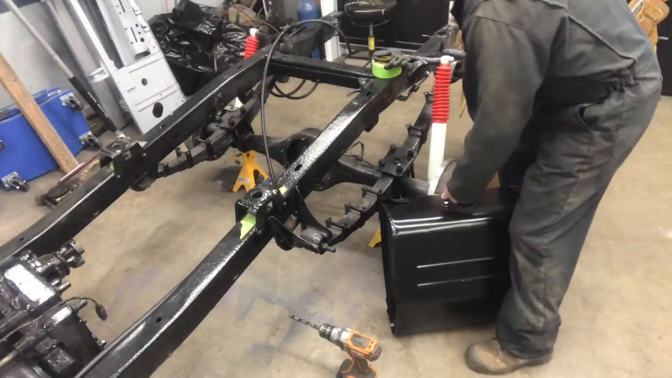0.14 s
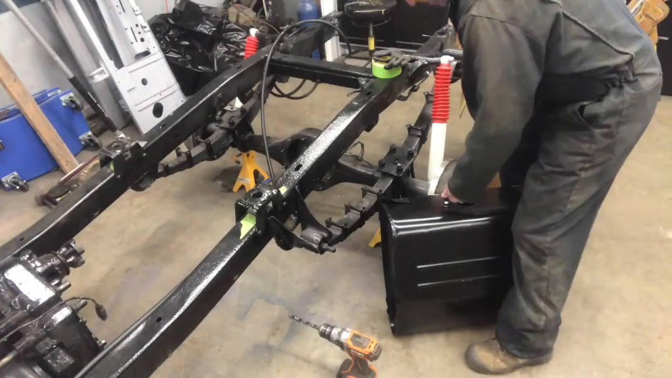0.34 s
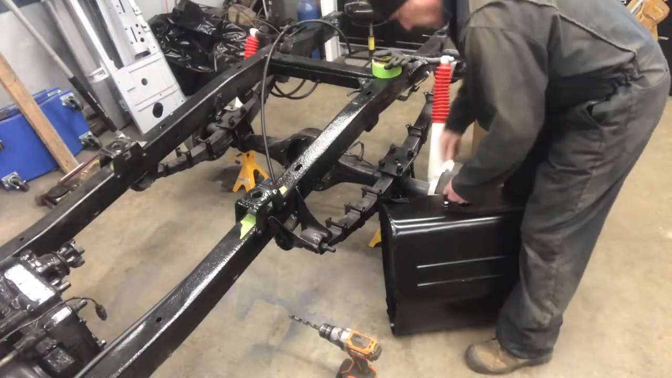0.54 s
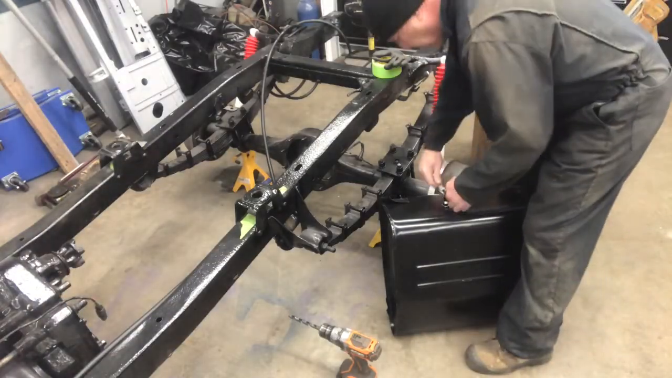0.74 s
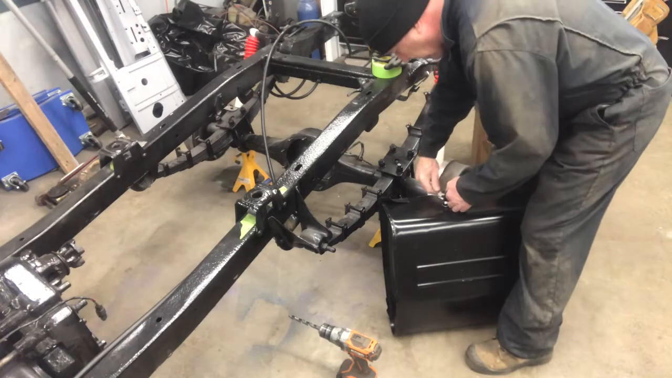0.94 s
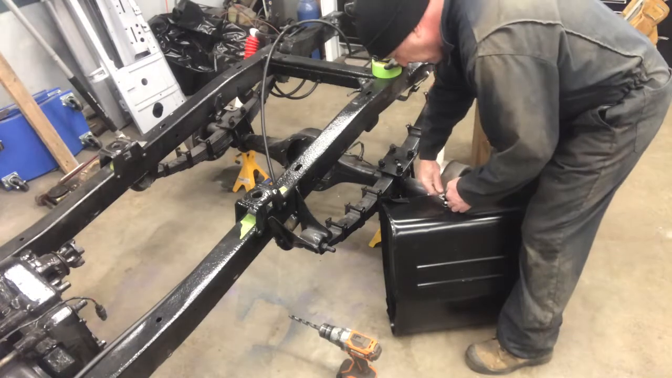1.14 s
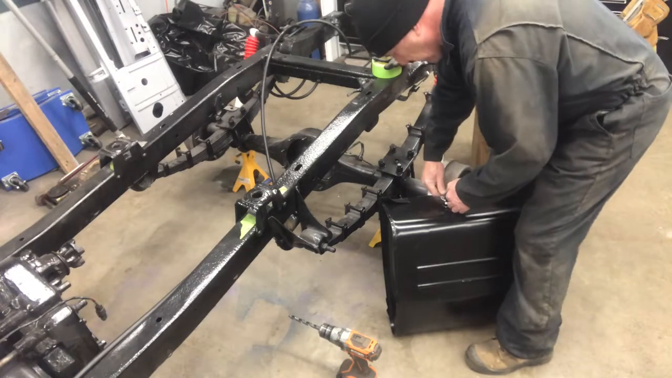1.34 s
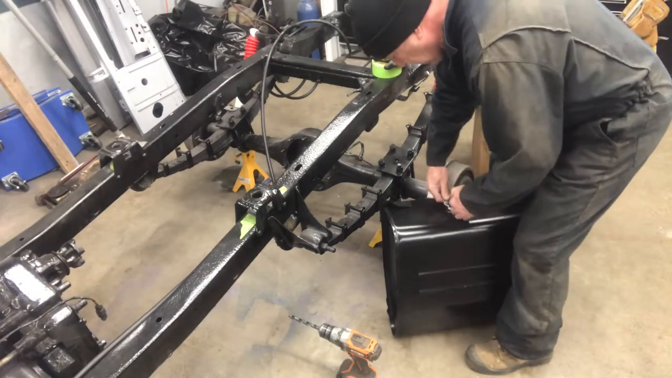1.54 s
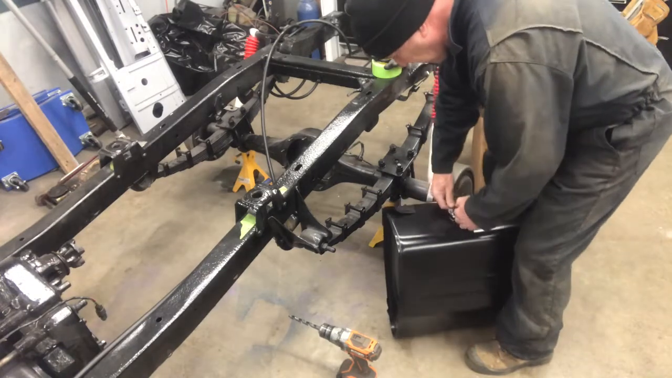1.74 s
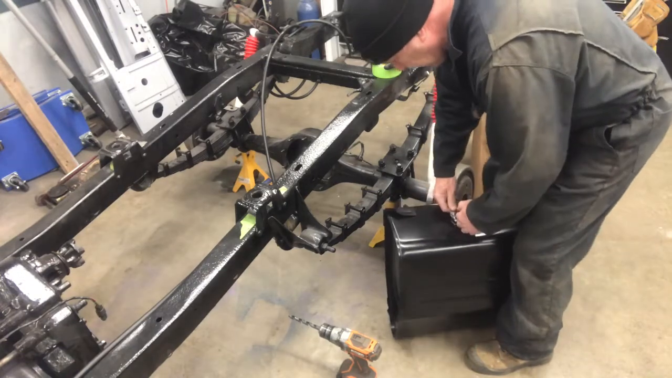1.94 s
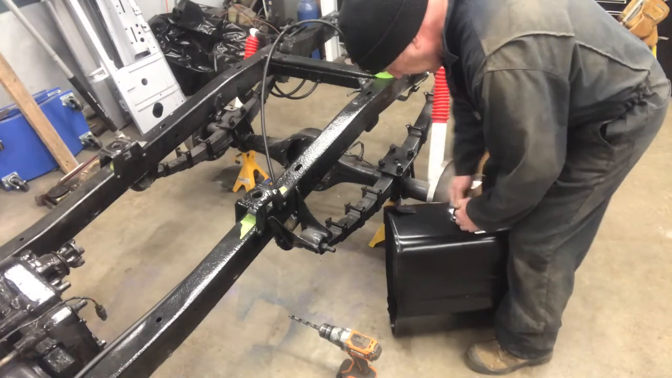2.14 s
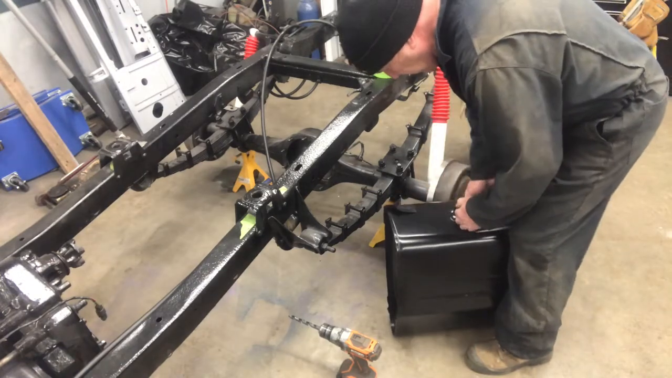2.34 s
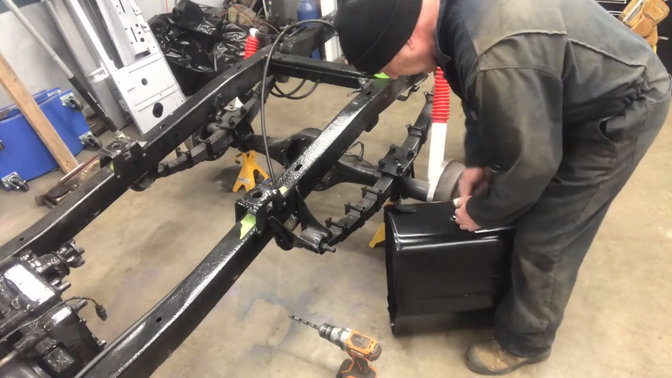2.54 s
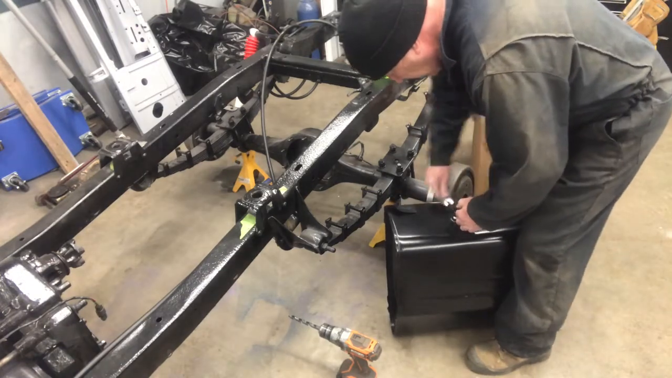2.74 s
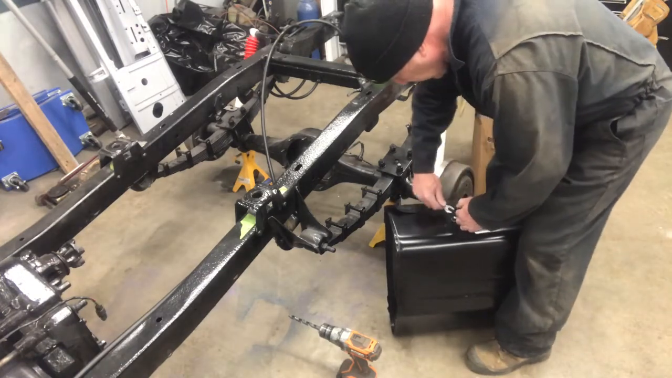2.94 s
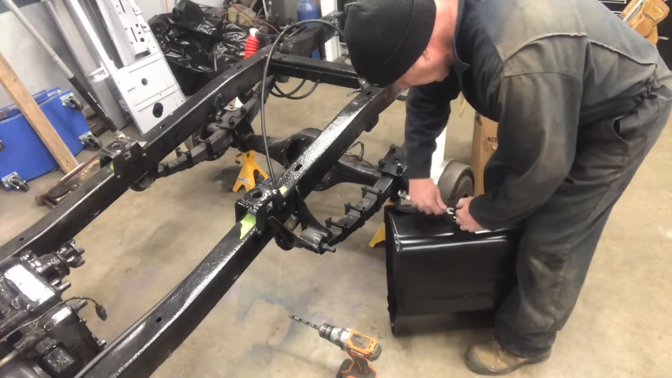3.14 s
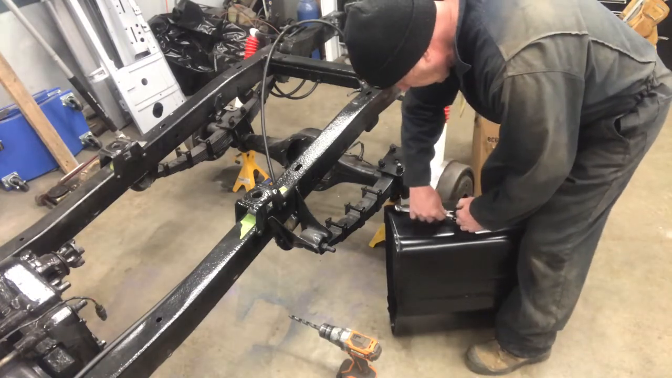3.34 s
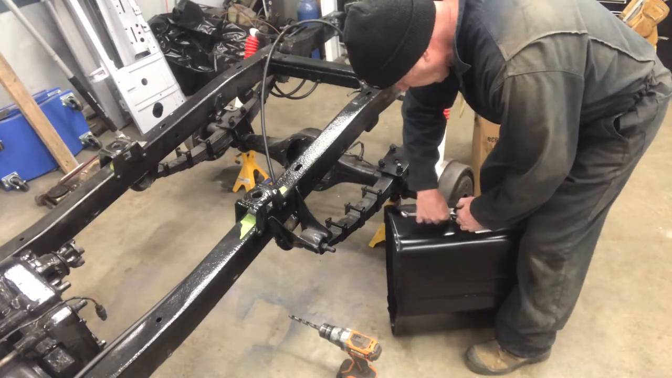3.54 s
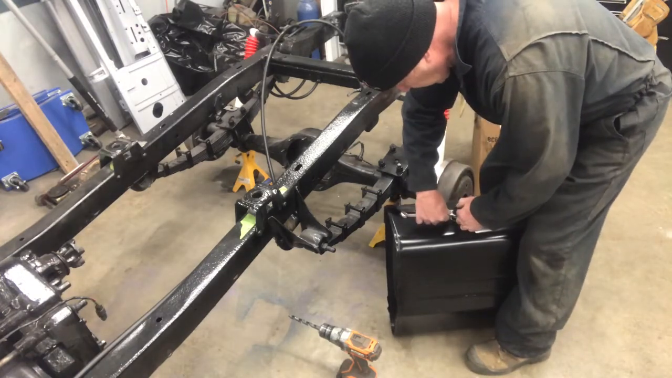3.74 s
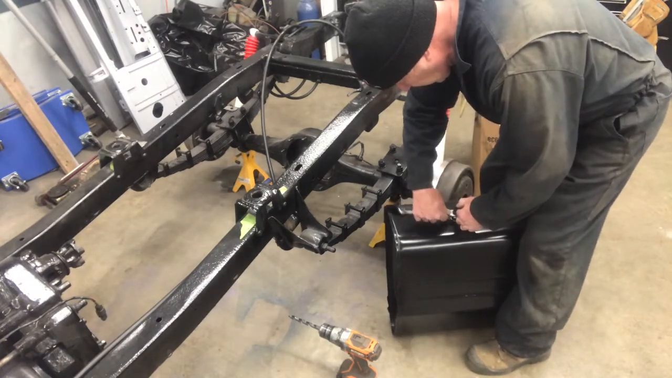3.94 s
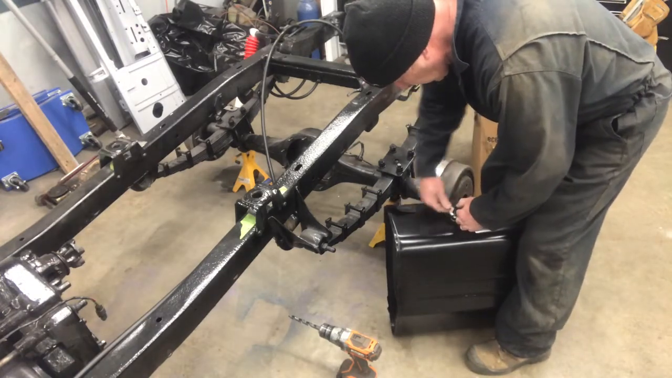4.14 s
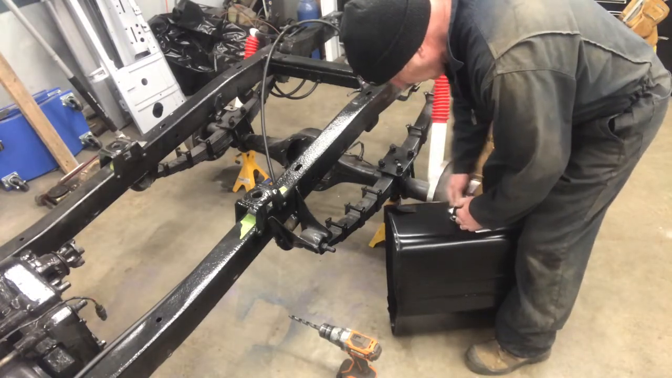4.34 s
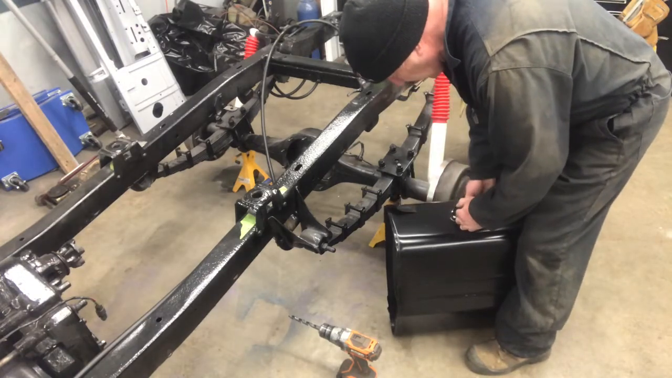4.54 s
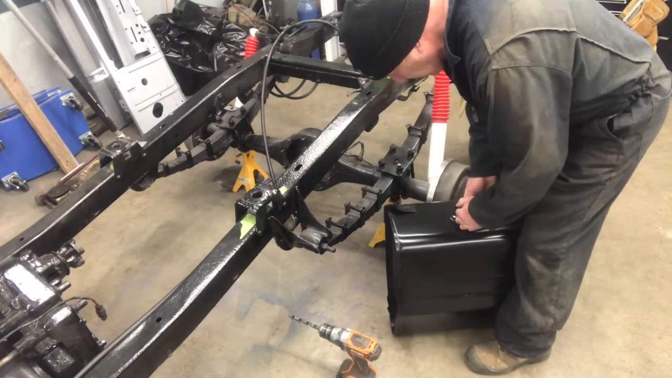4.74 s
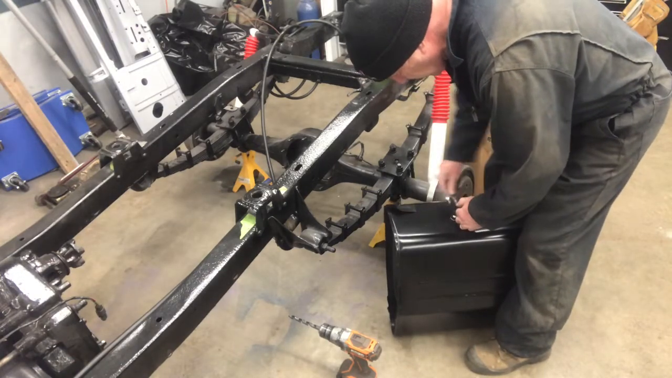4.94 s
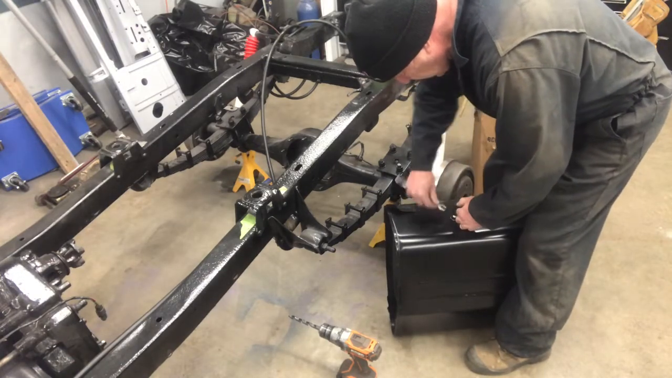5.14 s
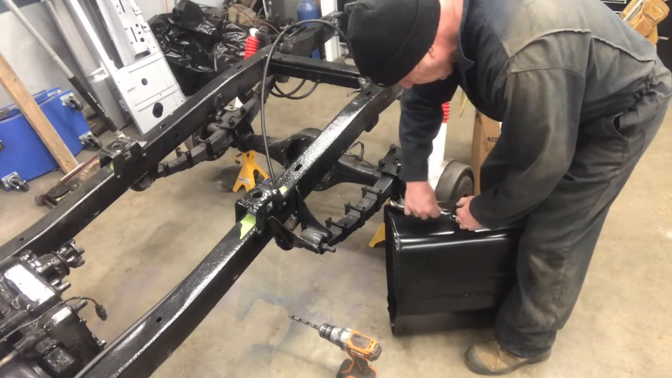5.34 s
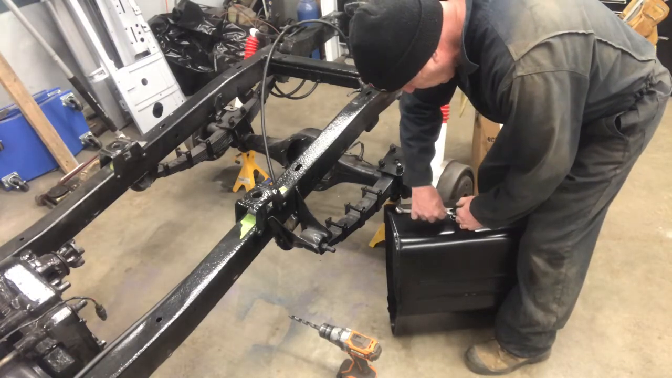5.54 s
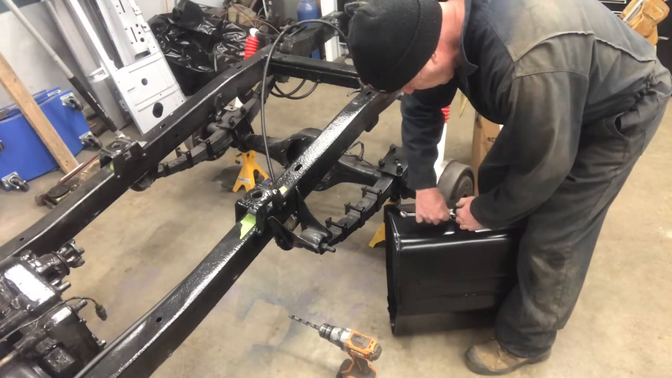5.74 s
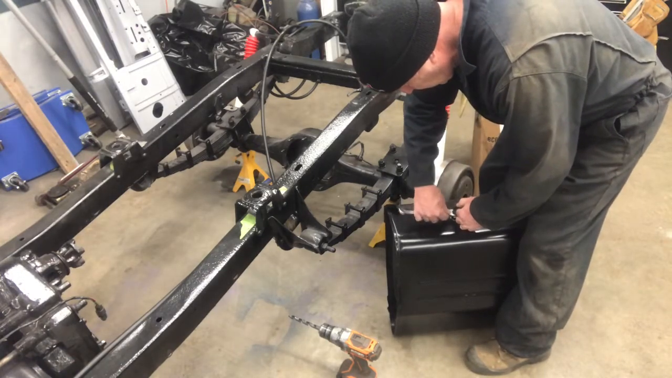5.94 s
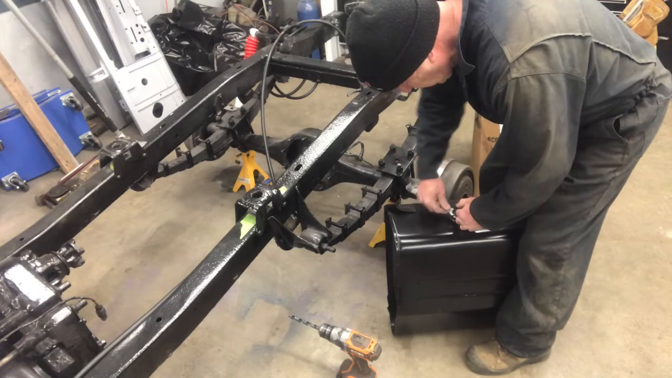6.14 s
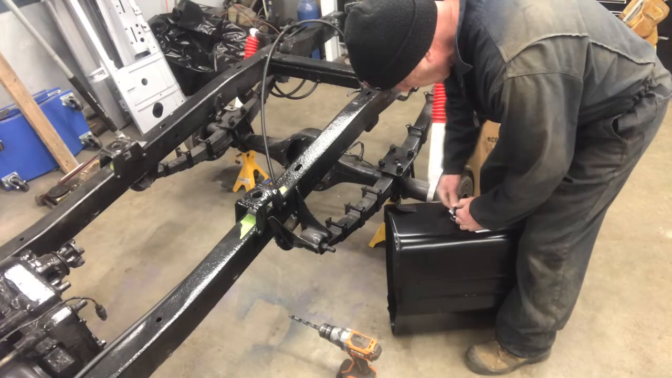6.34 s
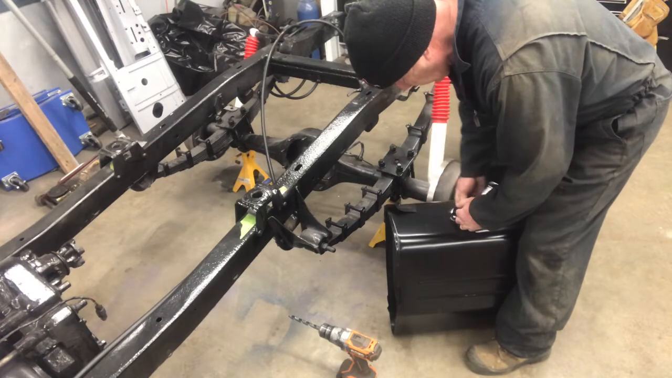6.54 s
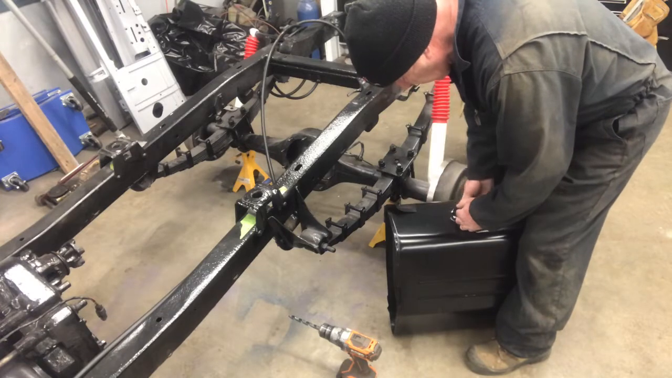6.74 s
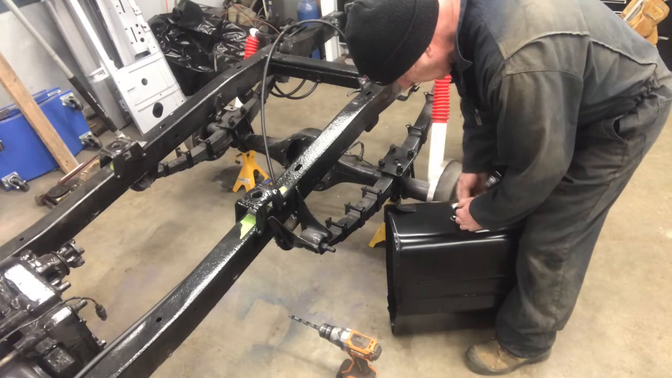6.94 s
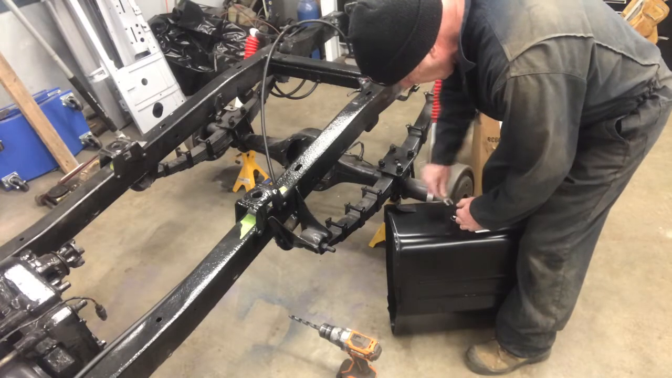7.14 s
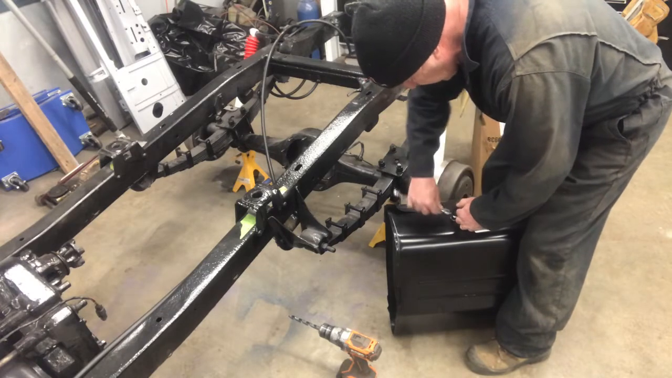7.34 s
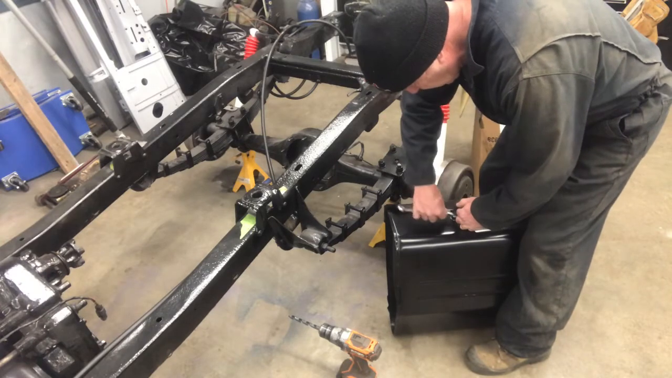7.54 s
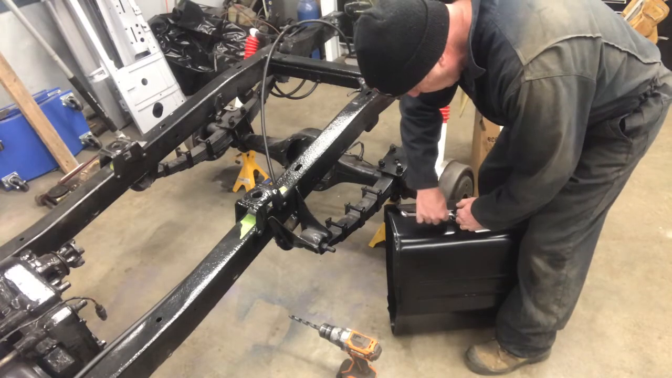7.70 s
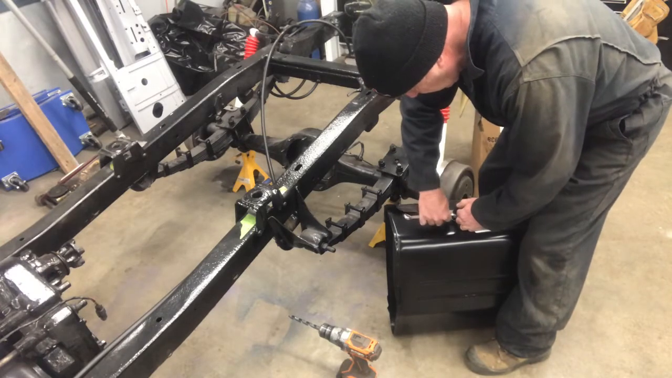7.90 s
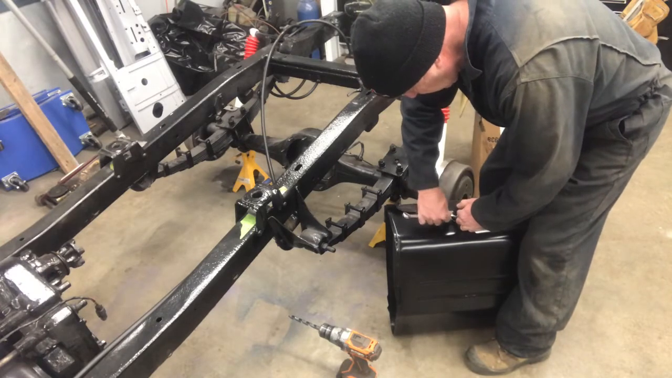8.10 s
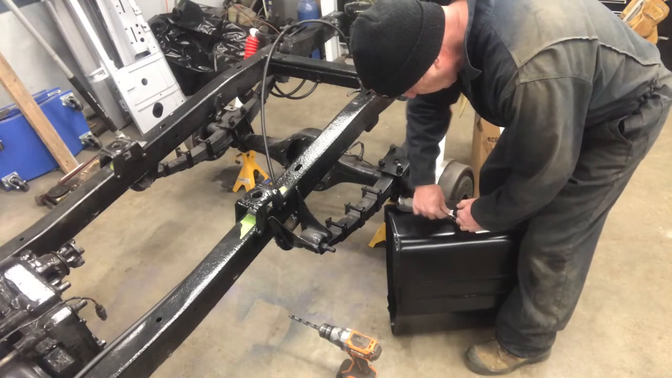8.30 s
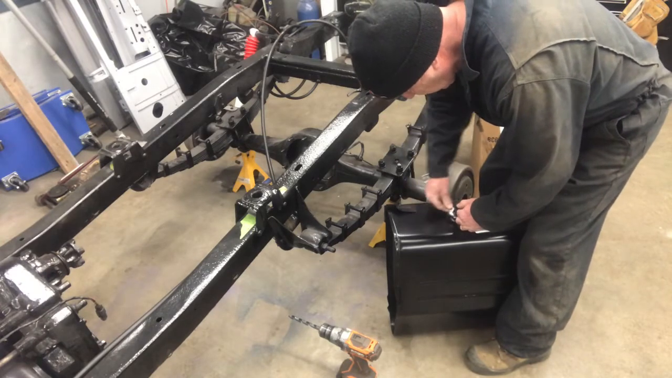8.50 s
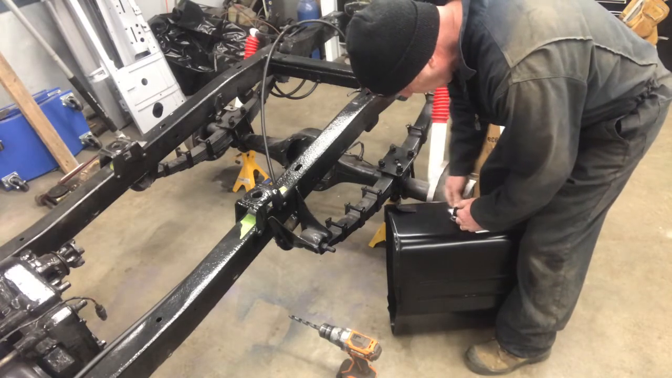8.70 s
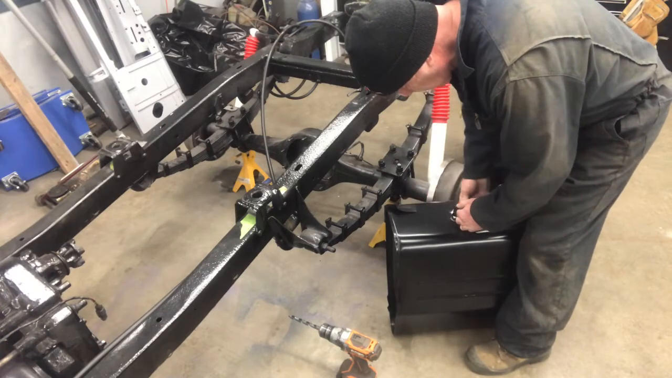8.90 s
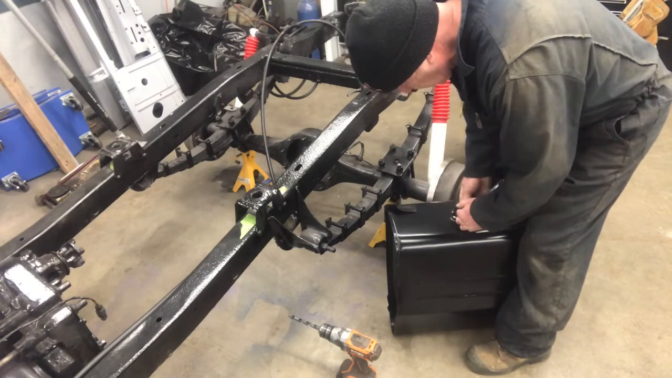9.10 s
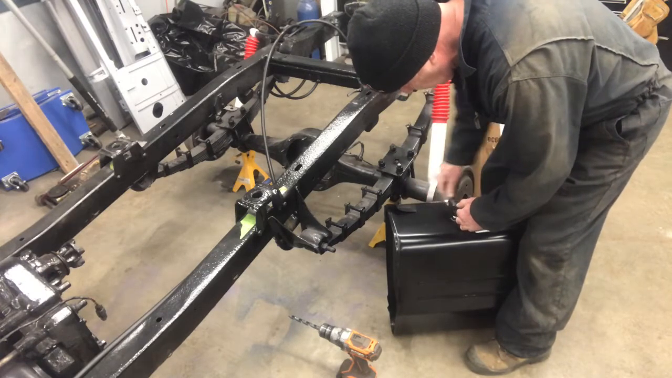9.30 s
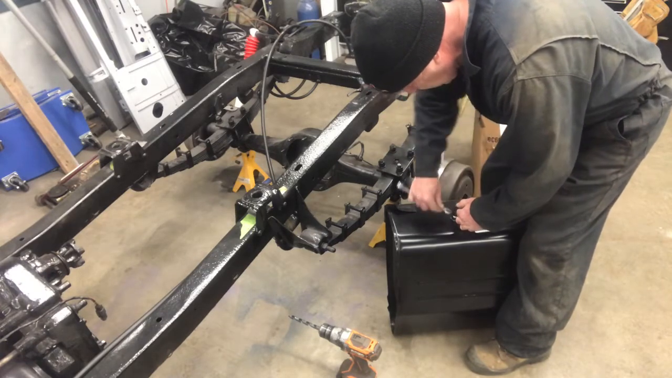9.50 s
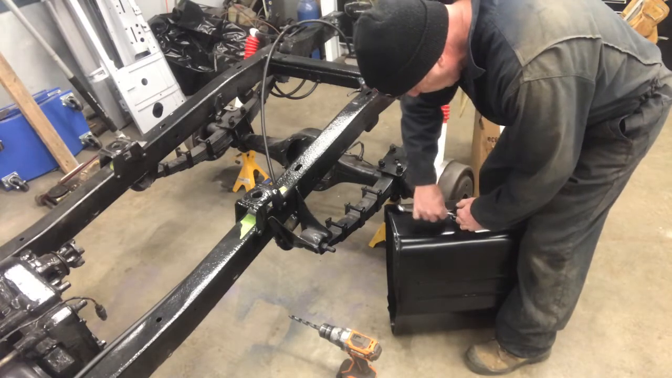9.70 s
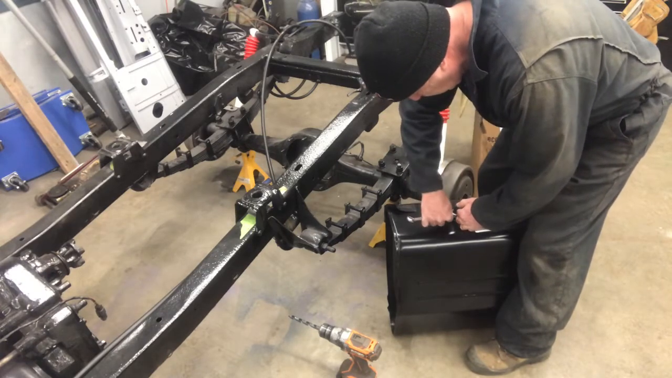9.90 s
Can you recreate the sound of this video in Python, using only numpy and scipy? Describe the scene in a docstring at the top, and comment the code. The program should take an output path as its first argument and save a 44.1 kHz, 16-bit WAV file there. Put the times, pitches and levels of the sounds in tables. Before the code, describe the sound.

Loose metal bangs on a hollow metal tank, hands bump and rub it, then spaced wrench clacks, scrapes and hollow clunks over faint hum.

```python
"""A workshop with an empty steel fuel tank on the floor, where a fitting is tightened with a wrench.
Loose metal clangs on the tank, small parts tick, a hand thuds and rubs on the shell, then the wrench works
in strokes: it clacks onto the fitting, clunks round against the tank and scrapes. Each blow is a noise crack
plus decaying sines and beating noise bands for the tank; scrapes are swarms of tiny blows, the rub is grains.
Dull air, hum and hiss are steady beneath, with faint electrical ticking and sizzle."""
import sys
import numpy as np
from scipy import signal
from scipy.fft import rfft, irfft
from scipy.io import wavfile
from scipy.ndimage import uniform_filter1d

SR = 44100
rng = np.random.default_rng(int(sys.argv[2]) if len(sys.argv) > 2 else 0)


def output_pcm(signal):
    """Save a mono or channel-first signal as 16-bit PCM at the path in sys.argv[1].

    Samples are clipped to [-1, 1] before scaling.
    """
    pcm = np.clip(np.atleast_2d(signal).T, -1, 1) * 32767
    wavfile.write(sys.argv[1], SR, np.round(pcm).astype(np.int16))


N = 439236


def amp(db):
    """Decibels to gain."""
    return 10 ** (np.asarray(db) / 20)


def evened(x):
    """Scales to rms 1."""
    return x / np.sqrt(np.mean(x ** 2) + 1e-20)


def read(points, hz, axis=1):
    """One column of a table, joined by straight lines over log frequency."""
    table = np.array(points)
    return np.interp(np.log(hz + 1), np.log(table[:, 0] + 1), table[:, axis])


def add(mix, start_s, sound):
    """Mixes a sound in at its start time."""
    part = mix[max(round(start_s * SR), 0):][:len(sound)]
    part += sound[:len(part)]


def colour(x, db_at):
    """Filters x by a gain in dB that is a function of frequency."""
    hz = np.fft.rfftfreq(len(x), 1 / SR)
    return irfft(rfft(x) * amp(db_at(hz)), len(x))


def drift(x, knots_per_unit):
    """A random wander of about unit size along time or frequency."""
    knots = rng.standard_normal(4096)
    return np.interp(x * knots_per_unit, np.arange(len(knots)), knots)


# Spectrum of the still workshop air. Each row: frequency in Hz, relative density in dB per Hz.
AIR_COLOUR = [(20, -27.5), (35, -5), (48, 5.5), (65, 4), (90, -5.5), (130, -8), (170, -3.5), (340, -7),
              (550, -13.5), (800, -16), (1250, -15), (2200, -26.5), (4400, -27.5), (5200, -42)]
# Hum of the machines. Each row: frequency in Hz, rms level in dB ahead of the microphone.
HUM = [(59.2, -54), (120, -67), (129.2, -62.5), (176, -78), (217, -66), (346, -67)]


def workshop(air_db=-56, hiss_db=-67.0, waver=.07):
    """Room tone: dull filtered noise, sines that waver gently in level and phase, and the microphone's hiss."""
    t = np.arange(N) / SR
    air = evened(colour(rng.standard_normal(N), lambda f: read(AIR_COLOUR, f)))
    hum = np.zeros(N)
    for hz, db in HUM:
        level = amp(db) * np.sqrt(2) * (1 + waver * drift(t, 3.6))
        hum += level * np.sin(2 * np.pi * hz * t + 0.33 * drift(t, 1.53))
    return amp(air_db) * air + hum + amp(hiss_db) * rng.standard_normal(N)


# Thin electrical sizzle in short bursts.
# Each row: centre in Hz, width in Hz, rms level in dB ahead of the microphone.
SIZZLE = [(9650, 420, -73.5), (11500, 550, -80.5), (13100, 800, -72)]


def interference(tick_db=-39.5, stray_db=-41.5, strays_per_s=25, burst_hz=32.3):
    """Electrical pickup: regular pin-prick ticks, weaker stray ones, and fluttering bands of noise."""
    t = np.arange(N) / SR
    ticks = amp(stray_db) * (rng.random(N) < strays_per_s / SR) * rng.uniform(.5, 1.2, N)
    regular = np.arange(.0145, N / SR, .1024)  # first tick and spacing in seconds
    ticks[(regular * SR).astype(int)] += amp(tick_db + rng.standard_normal(len(regular)))
    tick_colour = [(500, -37), (3500, 7.5), (5200, -2.5), (7500, 3), (11000, 5), (15000, 10)]  # Hz, dB
    out = colour(ticks, lambda f: read(tick_colour, f))
    for hz, width_hz, db in SIZZLE:
        band = colour(rng.standard_normal(N), lambda f: -np.minimum(3 * (2 * (f - hz) / width_hz) ** 2, 80))
        cycle = np.sin(2 * np.pi * (burst_hz * t + rng.random()) + drift(t, 6))
        bursts = np.clip(cycle + .6 * drift(t, 120) - .3, 0, .6)
        out += amp(db) * evened(band * bursts)
    return out


def contact_db(hz, contact, octaves=0.32):
    """A heavy push feeds the low modes, a hard edge the high ones, and the spot hit lifts or cuts one band."""
    bass_db, hard_db, favoured_hz, boost_db = contact
    heavy = read([(170, 0.94), (330, 0.35), (700, 0.0029)], hz)
    hard = read([(1300, 0.039), (3800, 1.105), (9000, 1.91)], hz)
    favoured = np.exp(-.5 * (np.log2((hz + 1) / favoured_hz) / octaves) ** 2)
    return bass_db * heavy + hard_db * hard + boost_db * favoured


def plain(bass_db, hard_db):
    """A contact that favours no band: its boost is zero, so its frequency does not matter."""
    return bass_db, hard_db, 424, 0


def dying(t, t60, hold=0.0069):
    """Exponential decay, held up at first while the room fills with reflections."""
    return amp(-60 * (np.hypot(t, hold) - hold) / t60)


# Where a blow lands: the free shell, the shell held down by a hand, or the fitting.
PLACES = ["free", "held", "fitting"]
# The crowd of weaker, overlapping modes.
# Each row: frequency in Hz, then relative level in dB struck free, held and on the fitting.
CLATTER = [(54, -15, -17, -32), (100, -2, -30, -39), (134, -2, -10.5, -26), (248, -1, -15.5, -22),
           (340, -1.5, -16.5, -22.5), (586, -5.5, -18.5, -24.5), (970, -15, -20, -31.5),
           (1290, -7.5, -13, -26.5), (1550, -14, -18, -35.5), (1910, -14.5, -22.5, -29.5),
           (4350, -21, -24.5, -38.5), (5060, -31.5, -34, -44.5), (7680, -37.5, -38.5, -51.5),
           (15260, -39, -41, -65)]
# How long that crowd rings in the workshop, before the blow's ring factor.
# Each row: frequency in Hz, base 60 dB decay time in seconds.
BASE_T60 = [(100, 0.7), (300, 0.69), (800, 0.9), (2000, 0.7), (4500, 0.64), (5500, 0.59), (9000, 0.41),
            (15000, 0.19)]


def clatter(t, place, contact, ring, swell_cycles=0.9, patchy_db=2.0):
    """The overlapping modes and their echoes: each noise band beats in patches and dies at its own speed."""
    hz, times, z = signal.stft(rng.standard_normal(len(t)), SR, nperseg=512)
    patches = uniform_filter1d(rng.standard_normal(z.shape), size=2, axis=0)
    patches = uniform_filter1d(patches, size=6, axis=1)
    z = z * amp(patchy_db * evened(patches))
    z *= dying(times, ring * read(BASE_T60, hz)[:, None])
    z *= 1 - np.exp(-(times + 0.0012) * (hz[:, None] + 60) / swell_cycles)
    dense = signal.istft(z, SR, nperseg=512)[1][:len(t)]
    column = 1 + PLACES.index(place)
    dense = colour(dense, lambda f: read(CLATTER, f, axis=column) + contact_db(f, contact))
    return dense * np.minimum(t / 0.00024, 1)  # short fade-in, in seconds


# The clear modes of the tank.
# Each row: frequency in Hz, then relative level in dB struck free, held and on the fitting.
TANK = [(133.45, -25, -40, -49), (150.2, -66, -37, -53), (178.5, -30.5, -26, -41.5),
        (213.8, -21.5, -35.5, -47.5), (252.6, -36, -56, -60.5), (334.6, -19.5, -62, -49.5),
        (375, -23.5, -38, -55), (395.4, -31, -35, -43), (465, -24, -45.5, -46.5),
        (541.5, -31.5, -36, -44.5), (617.5, -51, -51, -46), (757.4, -51, -39, -51),
        (785.5, -28.5, -44, -47), (998, -31, -53, -59), (1042, -40, -36.5, -49), (1081.5, -27, -56, -48),
        (1130, -34, -36.5, -48), (1255, -42, -57, -72), (1345, -33, -49, -51), (1385, -51, -31, -49),
        (1473, -31.5, -46, -73), (1732, -32.5, -38, -49.5), (2058, -36.5, -42, -54.5),
        (2235, -35, -52, -49), (2460, -37.5, -66, -86), (3200, -36, -50, -51.5), (3500, -34, -71, -55.5),
        (3790, -38, -39.5, -53.5), (4460, -40.5, -52, -93), (4430, -56, -41.5, -57.5)]


def modes(t, place, contact, ring, swell_cycles=2.5, waver=0.63):
    """The clear modes as sines: all swell over a few cycles; echoes blur high ones most in size and phase."""
    out = np.zeros(len(t))
    for hz, *levels_db in TANK:
        size = amp(levels_db[PLACES.index(place)] + contact_db(hz, contact))
        swell = 1 - np.exp(-t * hz / swell_cycles)
        blur = np.sqrt(hz / 1000)
        t60 = ring * read(BASE_T60, hz) * read([(200, 1.15), (1400, 1.05), (4000, .85)], hz)
        phase = 2 * np.pi * (hz * t + rng.random()) + .9 * blur * drift(t, 35)
        wobble = 1 + waver * min(blur, 1) * drift(t, 50.7)
        out += size * swell * dying(t, t60) * wobble * np.sin(phase)
    return out


def tank(place, contact, ring, clear_db=0, clear_sustain=0.97):
    """One second of the tank's answer to a blow: clear modes over clatter, their decay scaled by ring."""
    t = np.arange(SR) / SR
    fade = np.minimum((1 - t) * 10, 1) ** 2
    clear = amp(clear_db) * modes(t, place, contact, ring * clear_sustain)
    return fade * (clear + clatter(t, place, contact, ring))


# Metal slides on the fitting.
# Each row: start in seconds, length in seconds, force in dB, boost of the shell's hollow answer in dB.
SCRAPES = [(.0, 0.026, -19, 2), (.265, .05, -22.5, -2), (0.641, 0.034, -14.5, -3), (2.373, .06, -10.5, -4),
           (3.454, 0.062, -8.5, 11), (4.666, 0.053, -8, 6.5), (6.829, 0.058, -7.5, 8)]


def scrapes(slips_per_s=900, spread_db=7.5, ring=0.85, bass_db=3.5, hard_db=6, hollow_hz=424):
    """Sliding metal sticks and slips: a swelling swarm of tiny blows on the fitting."""
    out = np.zeros(N)
    for start_s, length_s, force_db, hollow_db in SCRAPES:
        n = int(length_s * SR)
        slips = (rng.random(n) < slips_per_s / SR) * rng.choice([-1, 1], n)
        slips = slips * amp(spread_db * rng.standard_normal(n)) * np.linspace(0, 1, n)
        slips /= np.linalg.norm(slips) + 1e-9
        contact = bass_db, hard_db, hollow_hz, hollow_db
        answer = tank("fitting", contact, ring, clear_db=-3.5)  # sliding damps the clear modes
        add(out, start_s, amp(force_db) * signal.fftconvolve(slips, answer))
    return out


def crack(contact, t60=0.15, level_db=-32.5, patchy_db=3.5):
    """The snap of steel on steel, straight from the contact: decaying noise with its own uneven spectrum."""
    t = np.arange(4096) / SR
    shape = [(150, -3), (400, -9.0), (1300, 10.5), (2500, -9.0),
             (4600, 6), (6000, -5.0), (10000, -9.0), (15500, -21)]  # Hz, dB

    def snap_db(f):
        return read(shape, f) + contact_db(f, contact) + patchy_db * drift(f, 0.00307)

    snap = colour(rng.standard_normal(len(t)), snap_db)
    return snap * amp(level_db - 60 * t / t60)


def blow(place, contact, ring, crack_db):
    """One blow cracks and sets the tank ringing."""
    sound = tank(place, contact, ring)
    add(sound, 0, amp(crack_db) * crack(contact))
    return sound


LOOSE_RING = 1.29  # ring factor of the loose fitting

# Small parts touch the loose fitting. Each row: start in seconds, force in dB.
TICKS = [(.345, -11.5), (1.507, -26), (1.944, -16), (2.015, -19), (2.222, -20)]


def part_ticks(bass_db=-21, hard_db=-0.5, thinning_db_per_db=0.6469, crack_db=-7):
    """Light contacts on the loose fitting: the lighter the touch, the thinner its sound."""
    out = np.zeros(N)
    for start_s, force_db in TICKS:
        contact = plain(bass_db, hard_db - thinning_db_per_db * force_db)
        add(out, start_s, amp(force_db) * blow("fitting", contact, LOOSE_RING, crack_db))
    return out


# A hand bumps the shell. Each row: start in seconds, force in dB.
THUDS = [(0.656, -52), (1.966, -28.5), (1.986, -28.5), (2.221, -49)]


def thuds(ring=0.73, crack_db=-19):
    """Soft bumps on the shell: heavy bass, little edge, a short ring."""
    contact = 21.5, -6, 201, 6.5  # bass dB, hardness dB, favoured Hz, boost dB
    out = np.zeros(N)
    for start_s, force_db in THUDS:
        add(out, start_s, amp(force_db) * blow("free", contact, ring, crack_db))
    return out


# Loose metal drops on the free shell. Each row: start in seconds, force in dB.
CLANGS = [(.766, -3), (.938, -10.5), (1.174, -1.93)]


def clangs(ring=1.19, crack_db=11):
    """Hard drops that leave the free shell to ring long, with a strong crack."""
    contact = -3.5, .5, 500, -5  # bass dB, hardness dB, favoured Hz (here cut), boost dB
    out = np.zeros(N)
    for start_s, force_db in CLANGS:
        add(out, start_s, amp(force_db) * blow("free", contact, ring, crack_db))
    return out


# A hand rubs over the steel. Each row: start in seconds, swell length in seconds, level in dB.
RUBS = [(1.652, 0.12, -41.5), (1.833, 0.084, -41.5)]
# Colour of the rub's hiss. Each row: frequency in Hz, relative density in dB per Hz.
RUB_COLOUR = [(40, 4), (100, 10), (350, 12.5), (900, 2), (2200, 0), (4400, 3.5), (5000, -3), (7500, -8),
              (10000, -12.5), (15500, -9)]


def rub(grains_per_s=1400, spread_db=3, uneven_db=1.0, room_t60_s=0.83):
    """A hand shifts its grip: gritty friction grains under uneven strokes that swell and die with the room."""
    t = np.arange(N) / SR
    sizes = amp(spread_db * np.clip(rng.standard_normal(N), -2, 2))
    grains = (rng.random(N) < grains_per_s / SR) * rng.choice([-1, 1], N) * sizes
    power = np.zeros(N)
    for start_s, length_s, level_db in RUBS:
        swell = np.clip((t - start_s) / length_s, 0, 1)
        tail = dying(np.maximum(t - start_s - length_s, 0), room_t60_s)
        power += (amp(level_db) * swell * tail) ** 2
    grit = evened(colour(grains, lambda f: read(RUB_COLOUR, f)))
    return np.sqrt(power) * amp(uneven_db * drift(t, 60)) * grit


# Modes of the steel wrench.
# Each row: frequency in Hz, relative level in dB, 60 dB decay time in seconds (held to 0.1-0.5 when played).
WRENCH = [(1066, -1, 0.73), (1230, 3.5, 0.19), (2170, -9, 0.52), (2390, -3, 0.69), (3020, -9, 0.39),
          (4650, -7, 0.18)]


def clink(blur=1., waver=0.58, rise_s=0.0039):
    """The wrench's own short ring: decaying sines, smeared in size and phase by the room."""
    t = np.arange(SR // 2) / SR
    out = np.zeros(len(t))
    for hz, db, t60 in WRENCH:
        envelope = amp(db - 60 * t / np.clip(t60, .1, .5)) * (1 - np.exp(-t / rise_s))
        phase = 2 * np.pi * (hz * t + rng.random()) + blur * drift(t, 118)
        out += envelope * (1 + waver * drift(t, 86)) * np.sin(phase)
    return out


# The wrench lands on the fitting.
# Each row: start in seconds, force in dB, weight behind it in dB, hardness in dB, the wrench's own ring in dB.
CLACKS = [(3.021, 0, 0, 3, -48), (5.395, 7.5, 1, 4.5, -39), (7.418, 1, -4, 4, -43), (7.539, 1, 6.5, 5, -56),
          (9.083, -16, 1, 3, -46.5), (9.642, 5, -10, 2, -60), (9.682, 7, 0, 3, -60)]


def clacks(ring_loss_per_s=0.063, crack_base_db=-7.5, softening_db_per_db=0.2):
    """Wrench on fitting: the fitting rings less as it tightens, and weight behind the wrench softens the crack."""
    out = np.zeros(N)
    for start_s, force_db, weight_db, hard_db, clink_db in CLACKS:
        ring = LOOSE_RING - ring_loss_per_s * (start_s - CLACKS[0][0])
        crack_db = crack_base_db - softening_db_per_db * weight_db
        add(out, start_s, amp(force_db) * blow("fitting", plain(weight_db, hard_db), ring, crack_db))
        add(out, start_s, amp(clink_db) * clink())
    return out


# Each pull ends in a clunk on the held shell. Each row: start in seconds, force in dB, weight behind it in dB.
CLUNKS = [(3.539, 0.4, 4), (5.671, -0.48, 3), (7.85, 1.6, 4.5), (9.899, -0.5, -0.5)]


def clunks(hard_db=-3, brightening_db_per_db=3.5, ring=0.85, crack_db=2.5):
    """The wrench comes round against the held tank: the stronger the clunk, the brighter."""
    out = np.zeros(N)
    for start_s, force_db, weight_db in CLUNKS:
        contact = plain(weight_db, hard_db + brightening_db_per_db * force_db)
        add(out, start_s, amp(force_db) * blow("held", contact, ring, crack_db))
    return out


def scene():
    """The room tone, the pickup noise, the tank, the hand and the wrench at one microphone."""
    background = workshop() + interference()
    setting_up = part_ticks() + thuds() + clangs() + rub()
    strokes = clacks() + clunks()
    return (background + scrapes() + setting_up + strokes)[None]


# Colour of the microphone. Each row: frequency in Hz, gain in dB.
MICROPHONE = [(4500, -3), (5000, -5), (6500, -1), (9500, -5.5), (10500, -7), (12600, -0.5), (14000, -14),
              (16000, -9)]


def record(dry, low_cut_hz=38.0, edge_hz=15800):
    """The microphone colours the sound and loses the deepest bass; then a steep low-pass limits the band."""
    heard = colour(dry[0], lambda f: read(MICROPHONE, f))
    low_cut = signal.butter(N=8, Wn=low_cut_hz, btype="high", fs=SR, output="sos")
    thinned = signal.sosfilt(low_cut, heard)
    edge = signal.firwin(511, edge_hz, window=("kaiser", 9), fs=SR)
    return signal.oaconvolve(thinned, edge, "same")[None]


dry = scene()
out = record(dry)
output_pcm(out)
```